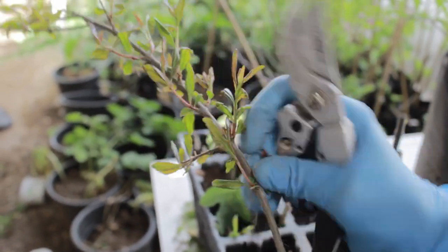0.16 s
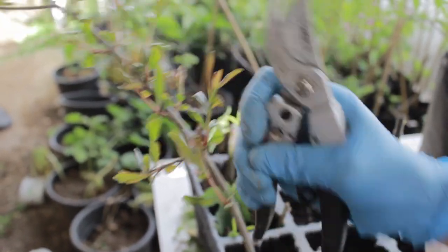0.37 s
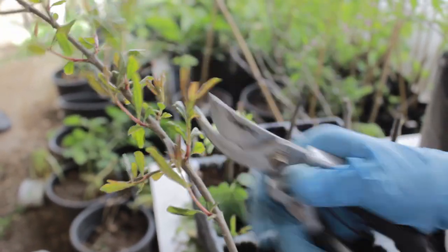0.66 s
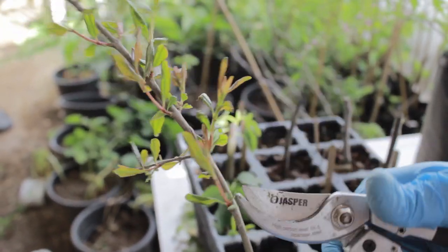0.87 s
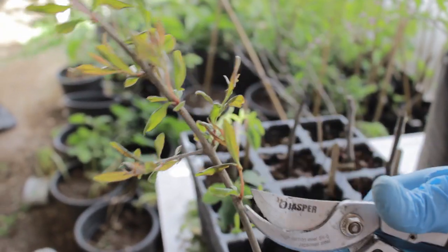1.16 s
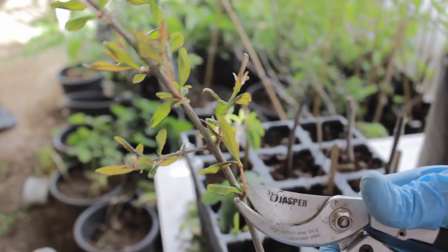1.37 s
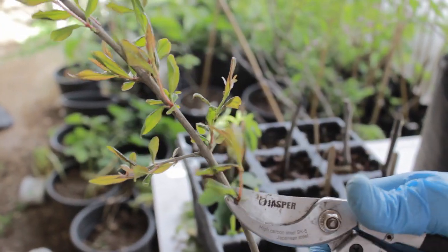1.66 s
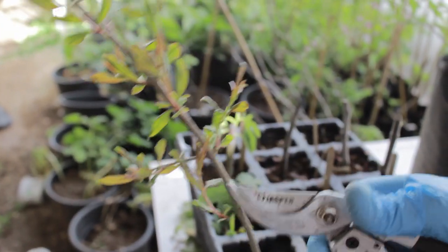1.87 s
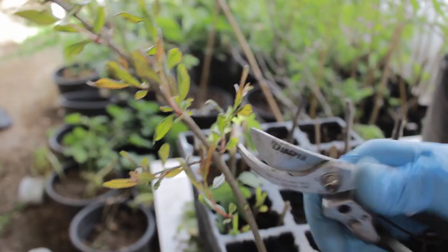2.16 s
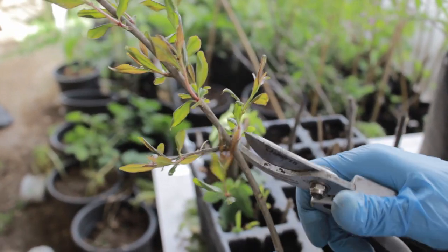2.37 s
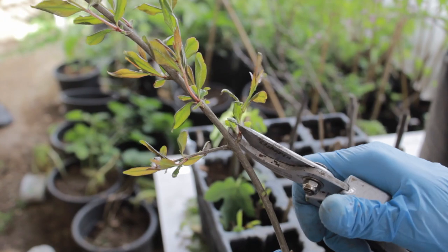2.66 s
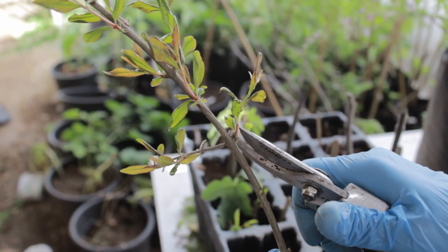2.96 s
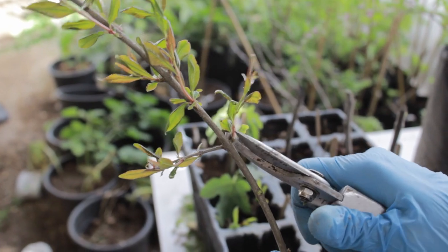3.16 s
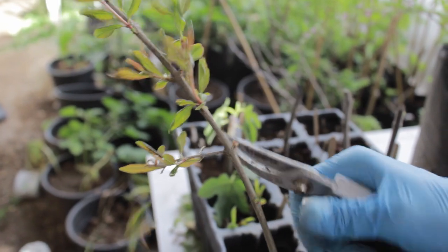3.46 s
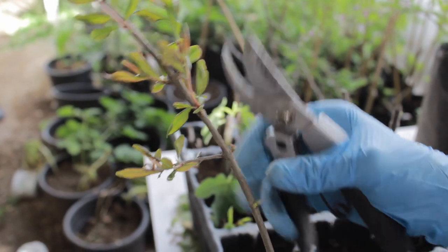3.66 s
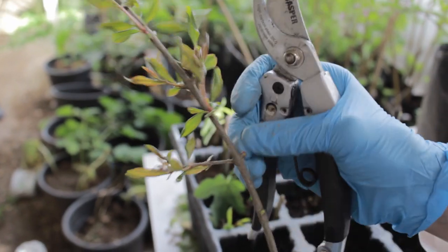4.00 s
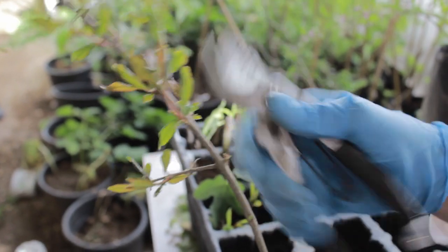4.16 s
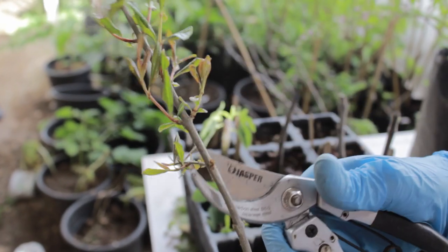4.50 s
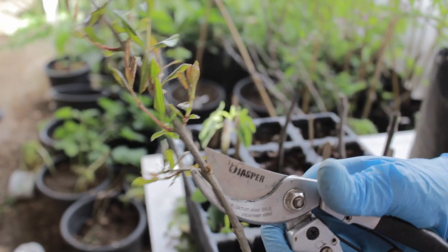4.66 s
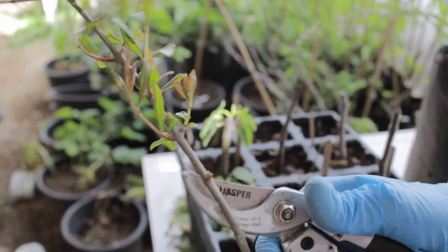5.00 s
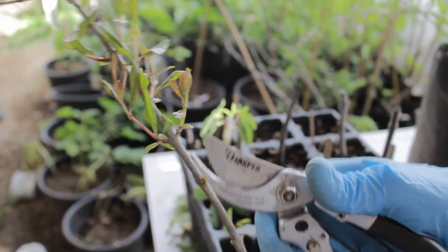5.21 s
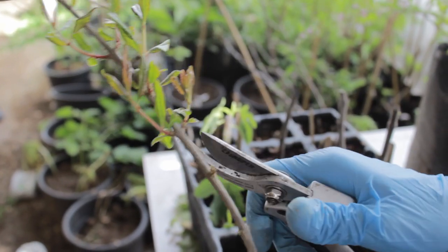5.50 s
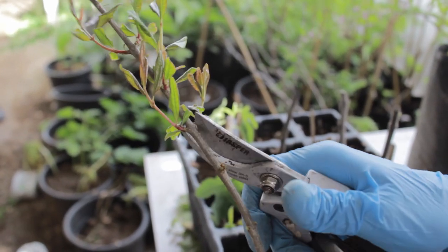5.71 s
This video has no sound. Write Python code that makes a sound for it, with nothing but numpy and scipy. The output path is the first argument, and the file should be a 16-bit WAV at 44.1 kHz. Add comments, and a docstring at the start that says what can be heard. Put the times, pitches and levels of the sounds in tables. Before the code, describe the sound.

Hand pruning shears work right at the microphone in a quiet garden. Their spring ticks and scrapes with a light steel ring, and three times the blades give a tiny squeal and crack through a thin shoot, then squeak open again. The third snip is the loudest. Leaves and a sleeve rustle softly, with a few dull bumps on the branch, while small birds chirp some way off over a faint outdoor wash.

```python
"""A garden nursery, with hand pruning shears snipping three side shoots off a branch at the microphone.
The spring ticks and scrapes in its seat, the blades stick and slip into a squeal as they bite,
the shoot cracks and sets them ringing, and the pivot squeaks open again. Close by, the hand brushes
leaves and sleeve and bumps the branch. Small birds chirp some way off over a quiet outdoor wash."""
import sys
import numpy as np
from scipy import signal
from scipy.fft import irfft
from scipy.io import wavfile

SR = 44100
rng = np.random.default_rng(int(sys.argv[2]) if len(sys.argv) > 2 else 0)


def output_pcm(signal):
    """Save a mono or channel-first signal as 16-bit PCM at the path in sys.argv[1].

    Samples are clipped to [-1, 1] before scaling.
    """
    pcm = np.clip(np.atleast_2d(signal).T, -1, 1) * 32767
    wavfile.write(sys.argv[1], SR, np.round(pcm).astype(np.int16))


N = 257629
BAND_LIMIT_HZ = 15900


def amp(db):
    """Decibels to gain."""
    return 10 ** (np.asarray(db) / 20)


def unit_rms(x):
    """Scales to rms 1."""
    return x / np.sqrt(np.mean(x ** 2) + 1e-20)


def add(mix, s, sound):
    """Mixes a sound in at s seconds."""
    part = mix[max(round(s * SR), 0):][:len(sound)]
    part += sound[:len(part)]


def noise(size, colour, tilt_db=0):
    """Noise of rms 1 shaped by (Hz, dB) points, tilted by tilt_db an octave above 1 kHz."""
    hz = np.fft.rfftfreq(size, 1 / SR)
    point_hz, point_db = np.transpose(colour)
    db = np.interp(np.log(hz + 1), np.log(point_hz + 1), point_db)
    gain = amp(db + tilt_db * np.log2(np.maximum(hz, 1000)))
    return unit_rms(irfft(gain * np.exp(2j * np.pi * rng.random(len(hz))), size))


def wander(size, per_s):
    """A smooth random curve of rms about 1."""
    knots = rng.standard_normal(8192)
    return np.interp(np.arange(size) * per_s / SR, np.arange(len(knots)), knots)


def die_away(t, t60):
    """A decay that falls 60 dB in t60 seconds."""
    return np.exp(-np.log(1000) * t / t60)


def echo(x, t60, delay_s=0.0076):
    """Pots, benches and walls scatter the sound into a short tail."""
    t = np.arange(SR // 2) / SR
    tail = noise(len(t), [(100, -71), (1500, 9.5), (5000, -6), (14000, -4.5)])
    tail *= die_away(t, t60) * (t > delay_s)
    return signal.fftconvolve(x, tail / np.linalg.norm(tail))[:N]


# The open air, far from the microphone. Each row: frequency in Hz, relative level in dB.
WASH_COLOUR = [(12, -32), (25, -8), (60, -6), (101, -6), (227, -7.5), (368, -0.5), (520, -3.5), (945, -3.5),
               (1500, -7), (2300, -9), (3400, 2), (4200, -3), (6300, -15.5), (10600, -23), (14300, -36),
               (15800, -44)]


def garden(wash_db=-56.5, swell_db=3, hum_db=-79):
    """A distant outdoor wash swells and sinks over a faint mains hum."""
    hum = np.sqrt(2) * np.sin(2 * np.pi * 60 * np.arange(N) / SR) * amp(2 * wander(N, 8))
    wash = noise(N, WASH_COLOUR) * amp(swell_db * wander(N, 5.144))
    return amp(wash_db) * wash + amp(hum_db) * hum


def chirp(length, top_hz, rise_s=.02, rise_hz=599, fall_hz_per_s=14000, waver_hz=170):
    """An up-flick and a long wavering down-slide in two voices, one whistling and one buzzy."""
    t = np.arange(int(length * SR)) / SR
    hz = top_hz - rise_hz * np.maximum(1 - t / rise_s, 0) - fall_hz_per_s * np.maximum(t - rise_s, 0)
    voices = np.zeros(len(t))
    for ratio, buzz in [(1, .015), (.99, .15)]:
        pitch = ratio * hz * (1 + buzz * wander(len(t), 700)) + waver_hz * wander(len(t), 70)
        voices += amp(4 * wander(len(t), 120)) * np.sin(2 * np.pi * np.cumsum(pitch) / SR)
    return unit_rms(voices * signal.windows.tukey(len(t), .6))


# Small birds some way off across the nursery.
# Each row: start and length in seconds, top pitch in Hz, relative level in dB.
BIRD_CHIRPS = [(0.042, 0.089, 4605, -43.5), (0.13, .07, 3799, -47), (0.19, .1, 4510, -50),
               (0.386, 0.055, 4411, -51.5), (0.778, .1, 4010, -47.5), (1.413, 0.097, 4990, -52.5),
               (1.565, 0.085, 4330, -50), (1.787, 0.086, 4190, -49), (2.063, 0.1174, 4365, -46),
               (2.198, 0.062, 4690, -47), (2.229, 0.091, 3800, -44.5), (2.377, .08, 4280, -54.5),
               (3.018, .13, 4310, -49.5), (3.236, 0.16, 4265, -53), (3.479, .045, 4380, -44.5),
               (3.512, 0.068, 3980, -44.5), (3.618, .12, 4630, -42), (4.14, .1, 4193, -51),
               (4.403, 0.14, 4874, -46), (5.221, 0.1117, 4140, -45.5)]


def birds(faint_every_s=.4, faint_hz=4208, faint_db=-61.5):
    """Clear chirps among fainter ones at uneven times; distance dulls them all."""
    out = np.zeros(N)
    for s, length, top_hz, db in BIRD_CHIRPS:
        add(out, s, amp(db) * chirp(length, top_hz))
    for k, (late, pitch, size) in enumerate(rng.uniform(-1, 1, (20, 3))):
        faint = chirp(length=0.095, top_hz=faint_hz * (1 + pitch / 10))
        add(out, (k + .5 + late / 2) * faint_every_s, amp(faint_db + 2 * size) * faint)
    return signal.sosfilt(signal.butter(6, [2400, 5500], "band", fs=SR, output="sos"), out)


# Sleeve and leaves, brushed near the microphone. Each row: frequency in Hz, relative level in dB.
SLEEVE_COLOUR = [(60, -22.5), (160, -3.5), (350, 3), (600, -1), (1400, -3.5), (2500, -11), (4000, -15),
                 (7000, -25.5), (11000, -33.5), (16000, -55)]
LEAF_COLOUR = [(150, -23), (450, -14.5), (830, 6), (1100, -0.5), (1600, 1.5), (2500, -7), (4000, -8.5),
               (7000, -23.5), (11000, -52.5), (16000, -42)]
# The hand moving among them. Each row: fastest moment and half length in seconds, relative level in dB.
HAND_MOVES = [(0.016, 0.21, -55), (0.504, 0.12, -57), (1.4, 0.22, -56), (2.09, 1, -60.5),
              (4.633, 0.37, -53), (5.367, 0.15, -52.5), (5.84, 0.2, -43.5)]


def rustle(rest_db=-66.5, sleeve_db=-0.5, leaves_db=-7, crackle_db=-18, crackles_per_s=500):
    """Sleeve and crackling leaves swell with each move of the hand; leaves take over in a hard brush."""
    t = np.arange(N) / SR
    move_power = sum(amp(db) ** 2 * np.exp(-((t - s) / half) ** 2) for s, half, db in HAND_MOVES)
    level = np.sqrt(amp(rest_db) ** 2 + move_power)
    force = level / amp(-57.5)
    sleeve = amp(sleeve_db) * force ** -.15 * noise(N, SLEEVE_COLOUR)
    leaves = amp(leaves_db) * force ** 0.53 * noise(N, LEAF_COLOUR)
    hits = (rng.random(N) < crackles_per_s / SR) * amp(7.9 * np.minimum(rng.exponential(1, N), 3))
    crackle = signal.lfilter(*signal.butter(2, [900, 4500], "band", fs=SR), hits)
    flicker = amp(2.5 * wander(N, 90))
    return level * ((sleeve + leaves) * flicker + amp(crackle_db) * unit_rms(crackle))


# The hand on the branch, close by.
# Each row: start in seconds, level in dB, strongest frequency in Hz, decay time in seconds.
HAND_BUMPS = [(3.70, -59.5, 55, 0.026), (3.979, -49.5, 78, 0.0144), (3.999, -43, 62, 0.0136),
              (4.125, -56, 98.4, 0.019), (.094, -42.5, 550, 0.0192), (.410, -46, 440, 0.05),
              (.605, -53, 550, 0.0272), (1.205, -51.5, 467, 0.0524), (1.285, -48.5, 467, 0.027)]


def bumps(onset_s=.004):
    """The hand pushes the branch: dull thuds without any ring."""
    out, t = np.zeros(N), np.arange(SR // 4) / SR
    for s, db, hz, decay in HAND_BUMPS:
        colour = [(hz / 20, -35), (hz / 4, -12), (hz, 0), (hz * 2, -7), (hz * 10, -45), (hz * 200, -90)]
        add(out, s, amp(db) * noise(len(t), colour) * np.minimum(t / onset_s, 1) * np.exp(-t / decay))
    return out


# The modes of spring and handles, heard close. Each row: frequency in Hz and relative level in dB with
# the grip slack, t60 in seconds, then at full grip the pitch rise as a share and the level change in dB.
STEEL_MODES = [(1736, 5, 0.042, 0.19, -6), (2041, -0.5, 0.037, 0.095, -16), (2974, 0, 0.035, 0.113, 6.5),
               (3285, -8.5, 0.066, 0.04, 11.5), (3840, -11.5, 0.0071, 0.06, 24),
               (4637, 2, 0.029, 0.0037, -8), (5050, -6, 0.028, 0.067, -4), (5820, -14, 0.103, 0.012, -0.5),
               (7530, -18, 0.0294, 0.0082, 4), (8512, -17.5, 0.11, 0.024, 7), (8300, -24, 0.077, 0.078, 5),
               (10750, -12.5, 0.012, 0.036, 3), (11905, -20, 0.017, 0, 2)]


def steel_slip(grip, tilt_db, tick_db, tick_s=0.0041, onset_s=0.00047):
    """One slip: a dry tick, and the ring of spring and handles, which stiffen with the grip."""
    t = np.arange(SR // 12) / SR
    hz, db, t60, rise, grip_db = np.transpose(STEEL_MODES)[:, :, None]
    detune, weight = rng.standard_normal((2, len(hz), 1))  # no two slips touch the same spot
    hz = hz * (1 + rise * grip + .008 * detune)
    height = amp(db + grip * grip_db + tilt_db * np.log2(hz) + 2 * weight)
    modes = height * die_away(t, t60) * np.sin(2 * np.pi * (hz * t + rng.random(hz.shape)))
    ring = modes.sum(0) / np.linalg.norm(height)
    tick_colour = [(300, -28), (1200, -24), (1900, 6), (2500, -2.5), (4600, 3), (6800, -12),
                   (8500, -2.5), (10000, -19), (15000, -34)]
    tick = noise(len(t), tick_colour, tilt_db) * np.exp(-t / tick_s)
    return (ring + amp(tick_db) * tick) * np.minimum(t / onset_s, 1)


# Spring and pivot ticking at the microphone.
# Each row: start in seconds, relative level in dB, grip from 0 to 1, tilt in dB per octave.
SPRING_TICKS = [(0.297, -40.5, 0.07, 7), (0.413, -38.5, 0.1, -2.5), (0.5058, -39, 0.1, 0),
                (0.6777, -33.5, 0.15, .5), (0.687, -36, 0.12, -0.5), (.762, -44.5, 1, 4),
                (0.948, -45, 0.6, 3.5), (1.066, -44, 0.19, 5), (1.685, -28, 0.06, 2.5),
                (1.7175, -34.5, 0.55, -9), (1.731, -31.5, 0, 0.5), (2.028, -39.5, 0, 7.5),
                (2.5497, -30, 0.51, 2), (2.564, -40, 0.91, 0.5), (2.59, -34.5, 0.3, 4.5),
                (2.611, -37.5, 0.76, 1), (3.307, -31, 0.66, 4), (3.882, -36, 0.05, -3),
                (3.891, -36, 0.02, 1), (4.067, -46.5, .1, 9), (4.3493, -31.5, 0.7, 2.5),
                (4.693, -34, .55, 3.5), (4.752, -35, 0.58, 4), (4.842, -37, 0, -3.5),
                (5.201, -35, 0.18, 3.5), (5.7783, -34.5, .15, 2.5), (5.822, -31.5, .75, .5)]
# The spring scraping in its seat, just as near. Each row: start and length in seconds, relative level
# in dB, slips per second at full speed, first and last grip from 0 to 1, tilt in dB per octave.
SPRING_SCRAPES = [(.22, .1, -54, 430, .35, 0, 3.5), (0.507, .04, -47.5, 300, 0.25, .2, -0.5),
                  (0.699, 0.11, -40.5, 307.6, 0.61, 0.88, -0.5), (1.102, 0.045, -51.5, 300, .5, 0.5, 4),
                  (1.691, 0.032, -46.5, 304, .4, 0.73, 7.5), (1.988, 0.079, -50.5, 360, 0.1, 1, -1.5),
                  (2.552, 0.093, -55, 286, 0.5, .55, 3.5), (3.309, 0.052, -43.5, 300, 0.98, 0.68, 0.5),
                  (3.571, 0.054, -44.5, 400, .55, 0.97, -3), (3.897, 0.0878, -41, 226.5, .05, 0.16, 0),
                  (4.355, 0.03, -46, 380, 0.45, .45, -4.5), (4.701, 0.1573, -46, 200, 0.97, 1, 1.5),
                  (5.098, 0.11, -60, 300, 0.65, .7, 6.5)]


def spring(ticks_db=-1, scrapes_db=1, jitter=.18, uneven_db=2, speed_up_s=.025, take_hold_s=.02):
    """Single ticks, and scrapes made of quick uneven slips that keep the steel singing."""
    out = np.zeros(N)
    for s, db, grip, tilt in SPRING_TICKS:
        add(out, s, amp(db + ticks_db) * steel_slip(grip, tilt, tick_db=-2.5))
    for s, length, db, slips_per_s, first_grip, last_grip, tilt in SPRING_SCRAPES:
        t = 0
        for gap, size in rng.standard_normal((55, 2)):
            progress = min(t / length, 1)
            rate = slips_per_s * (1 - .4 * np.exp(-t / speed_up_s))  # breaks loose, then slips faster
            push_db = -2 * max(1 - t / take_hold_s, 0) - 9 * progress ** 2  # takes hold, then eases off
            slip = steel_slip(first_grip + (last_grip - first_grip) * progress, tilt, tick_db=-6)
            train_rms = np.sqrt(np.sum(slip ** 2) * rate / SR)
            if t < length:
                add(out, s + t, amp(db + scrapes_db + push_db + uneven_db * size) * slip / train_rms)
            t += np.exp(jitter * gap) / rate
    return out


# Blades and pivot squealing at the microphone. Each row: start and length in seconds, first and last
# pitch in Hz, level in dB, fall of the overtones in dB per octave, swell over the length in dB.
STEEL_SQUEALS = [(.785, .046, 1950, 2222, -49, 18, 8), (1.736, 0.02, 2846, 2763, -30.5, 18, 17),
                 (1.743, 0.0068, 1640, 1577, -33.5, 21, 0), (1.968, 0.017, 4900, 5450, -44, 15, 2),
                 (1.987, 0.053, 1968, 2183, -48, 11, -4.5), (3.351, 0.012, 2840, 2760, -34, 13, 10),
                 (3.554, 0.015, 4950, 5450, -46.5, 12.5, -6), (3.578, 0.061, 2115, 2007, -44.5, 26, -21),
                 (4.8807, 0.0077, 1721, 1650, -24.5, 6.5, 13), (5.033, 0.015, 4330, 5300, -43, 19, -12),
                 (5.104, 0.019, 2010, 2192, -50, 14, 0), (5.134, 0.0454, 2141, 1970, -52.5, 16, 7)]


def squeals(waver_hz=90, flutter_db=2.5):
    """Steel sticks and slips on steel fast enough to sing: a rough gliding tone with overtones."""
    out = np.zeros(N)
    for s, length, first_hz, last_hz, db, fall_db, swell_db in STEEL_SQUEALS:
        size = int(length * SR)
        progress = np.linspace(0, 1, size)
        hz = first_hz + (last_hz - first_hz) * progress + waver_hz * wander(size, 900)
        phase = 2 * np.pi * np.cumsum(hz) / SR
        harmonics = [k for k in range(1, 6) if k * last_hz < BAND_LIMIT_HZ]
        tone = sum(amp(-fall_db * np.log2(k)) * np.sin(k * phase) for k in harmonics)
        flutter = amp(flutter_db * wander(size, 500))
        envelope = amp(swell_db * progress) * signal.windows.tukey(size, .3)
        add(out, s, amp(db) * unit_rms(tone * flutter * envelope))
    return out


# A shoot cracking, heard close. Each row: frequency in Hz, relative level in dB.
SHOOT_COLOUR = [(60, -17), (300, -13), (550, -24), (850, -2.5), (1150, -14), (1600, -2.5), (2100, -1.5),
                (2750, 3.5), (3100, 0), (3900, 8), (5400, 3.5), (6900, -1), (8200, -2.5), (11000, -7.5),
                (15000, -20.5)]
# The ring of the shut blades. Each row: frequency in Hz, relative level in dB, t60 in seconds.
BLADE_MODES = [(1656, -3, .11), (1730, -15, 0.099), (1660, 9.5, 0.078), (1800, 1, 0.056), (2730, -16, 0.11),
               (3410, -2, 0.13), (3763, -32.5, 0.16), (4200, -20.5, 0.14), (5930, -11.5, 0.14),
               (6330, -16.5, .11), (7860, -17, 0.077), (8800, -8, 0.095), (10830, -20, .07)]
# Wood fibres snapping right at the microphone. Each row: start in seconds, level in dB, decay time in
# seconds, tilt in dB per octave, low cut in Hz, relative level of the blade ring in dB.
FIBRE_SNAPS = [(1.743, -40, 0.0036, 1, 1100, -45), (1.7512, -23, 0.0024, -4, 1230, -43.5),
               (1.7566, -25.5, 0.0061, -3, 1130, -26), (1.763, -34.5, 0.013, -3, 1200, -43),
               (3.3616, -29, 0.0084, -3.5, 1720, -48), (3.3628, -18.5, 0.00077, -3, 1800, -40.5),
               (4.883, -21, 0.0037, -12, 900, -27), (4.8863, -13, 0.0019, -2.5, 100, -24.5),
               (4.8866, -9.5, 0.00129, 1, 60, -44.5), (4.8932, -30.5, 0.0096, 2.5, 1200, -26.5)]


def snaps(onset_s=0.00026, hold_s=0.00023, ring_onset_s=0.000605):
    """Each shoot gives way in a few cracks, and each crack sets the blades ringing."""
    out, t = np.zeros(N), np.arange(SR // 4) / SR
    for s, db, decay, tilt, low_hz, ring_db in FIBRE_SNAPS:
        envelope = np.minimum(t / onset_s, 1) * np.exp(-np.maximum(t - hold_s, 0) / decay)
        crack = noise(len(t), SHOOT_COLOUR, tilt) * envelope
        low_cut = signal.butter(2, low_hz, "high", fs=SR)  # a thin shoot has no knock
        crack = signal.lfilter(*low_cut, crack)
        crack *= np.linalg.norm(envelope) / np.linalg.norm(crack)
        ring = sum(amp(level) * die_away(t, t60) * np.sin(2 * np.pi * (hz * t + rng.random()))
                   for hz, level, t60 in BLADE_MODES)
        add(out, s, amp(db) * (crack + amp(ring_db) * ring * np.minimum(t / ring_onset_s, 1)))
    return out


def scene():
    """One microphone: the shears are near and almost dry, the birds far and mostly echo."""
    shears = spring() + squeals() + snaps()
    song = birds()
    near = shears + amp(-18) * echo(shears, t60=.2)
    far = amp(-5) * song + amp(-4.5) * echo(song, t60=.33) + amp(-9) * echo(song, t60=.9)
    return (near + far + rustle() + bumps() + garden())[None]


def record(dry):
    """The input stage rounds off the loudest crack; a low-pass then limits the band."""
    rounded = dry / (1 + (dry / .43) ** 6) ** (1 / 6)
    low_pass = signal.firwin(255, BAND_LIMIT_HZ, window=("kaiser", 9), fs=SR)
    return signal.oaconvolve(rounded, low_pass[None], "same")


dry = scene()
out = record(dry)
output_pcm(out)
```